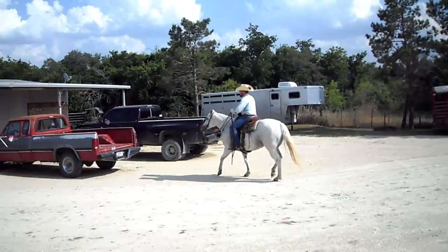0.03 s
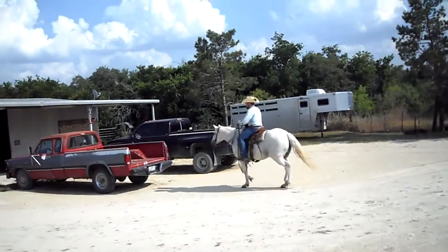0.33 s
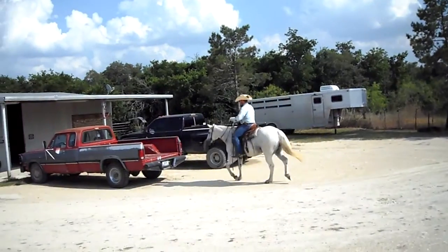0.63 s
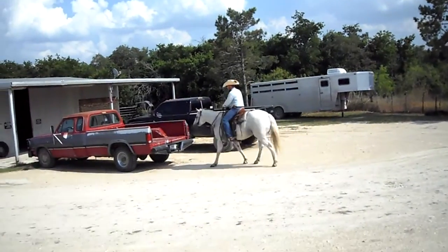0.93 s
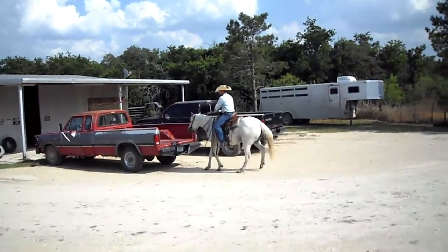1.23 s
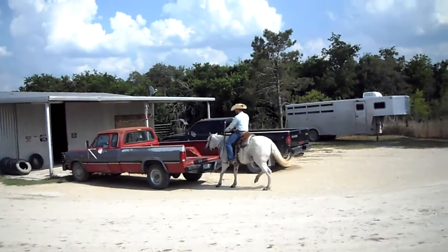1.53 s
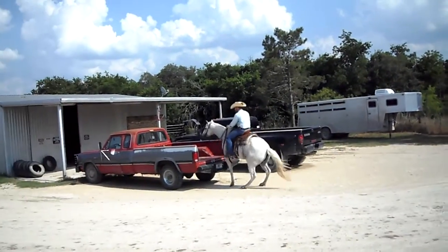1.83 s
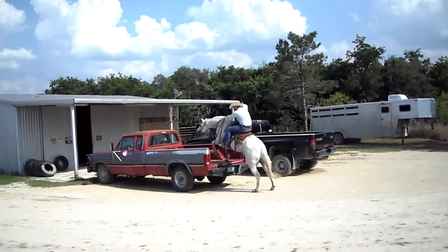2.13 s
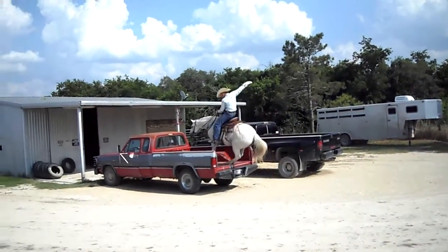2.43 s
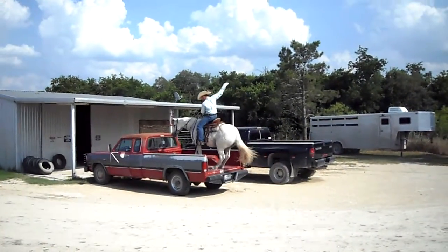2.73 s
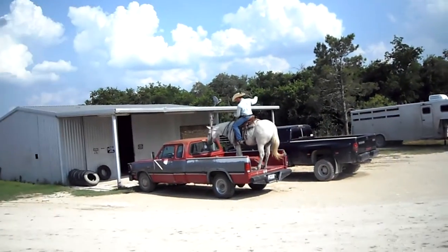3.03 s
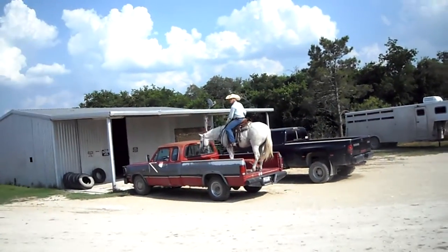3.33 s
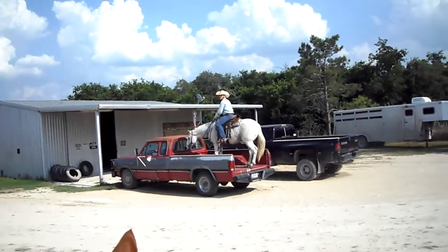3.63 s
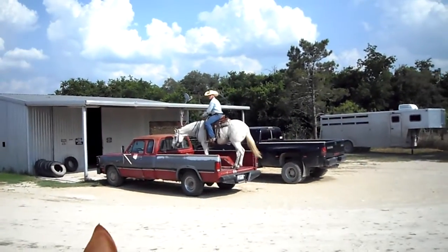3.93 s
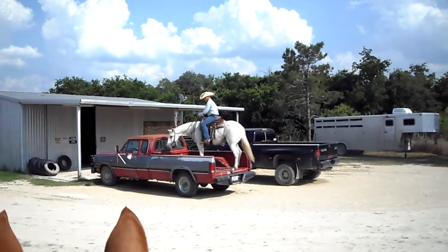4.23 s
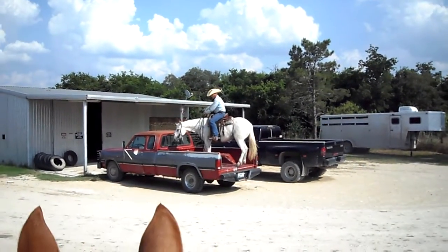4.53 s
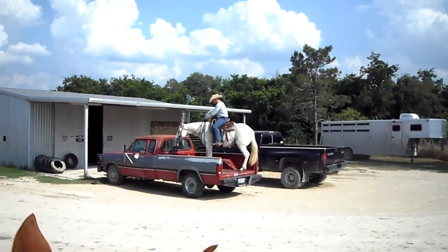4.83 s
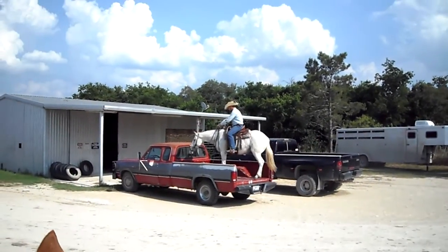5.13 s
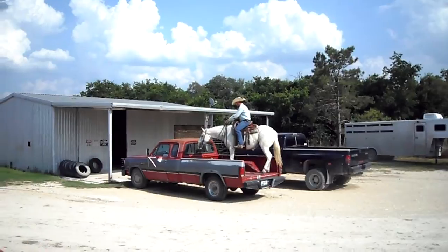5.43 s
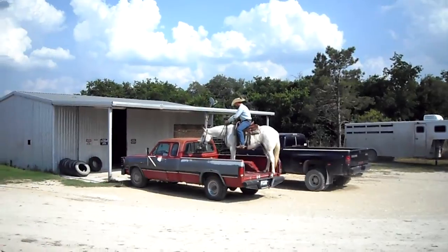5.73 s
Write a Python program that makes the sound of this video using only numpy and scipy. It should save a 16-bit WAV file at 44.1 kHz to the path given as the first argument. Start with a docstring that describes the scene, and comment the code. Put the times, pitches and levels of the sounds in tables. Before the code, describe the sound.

A horse's tack clicks, then its hooves boom on a steel pickup bed, setting something loose rattling over a faint machine hum.

```python
"""A ridden horse jumps into the steel bed of a pickup in a gravel yard and shifts its feet there.
Each hoof makes the sheet metal boom, and the rocking truck sets a loose fitting chattering.
The tack (the horse's straps and buckles) clicks and jingles close by; hooves and leather scuff,
and one step lands on gravel just before the jump.
A machine hums steadily across the yard, over soft outdoor noise and a thin hiss."""
import sys
import numpy as np
from scipy import signal
from scipy.fft import rfft, irfft
from scipy.io import wavfile
from scipy.ndimage import uniform_filter1d

SR = 44100
rng = np.random.default_rng(int(sys.argv[2]) if len(sys.argv) > 2 else 0)


def pcm_store(signal):
    """Save signal as 16-bit PCM."""
    levels = np.round(np.clip(np.atleast_2d(signal), -1, 1) * 32767)
    wavfile.write(sys.argv[1], SR, levels.astype(np.int16).T)


N = 259308

# Hoof blows: start_s, level_db, boom_db, body_db, clang_db, crack_db, boom_hz, push_s, spot_hz, spot_db
HOOF_BLOWS = [(2.093, -33, 2, 0, -4.5, -7, 189, 0.023, 657, -10),
              (2.375, -35, -7.5, 4.5, -8, 0.5, 188.5, 0.033, 640, -0.5),
              (2.474, -17, -5, 0, -3.5, 0, 142.6, 0.015, 1597, -10),
              (3.6257, -27, 0.5, -0.5, -1, 2.5, 150.6, 0.013, 2493, -7),
              (4.2938, -25.5, -1, 1.5, -1, 3.5, 208, 0.012, 491, -4),
              (4.821, -31.5, 3.5, -4.5, -2.5, 2, 140.3, 0.018, 1064, -2),
              (5.742, -36.5, 0, -3, 2, 3, 178, 0.014, 1627, 3)]
def hooves():
    """The horse lands and steps on the steel bed, each blow with its own tone."""
    out = np.zeros(N)
    for start_s, level_db, *tone_db, boom_hz, push_s, spot_hz, spot_db in HOOF_BLOWS:
        add(out, start_s, amp(level_db) * hoof(tone_db, boom_hz, push_s, spot_hz, spot_db))
    return out


# Where a blow's boom, body, clang and crack lie: pitch_hz
TONE_BANDS = [160, 520, 1500, 4500]
# How strongly the steel panels ring, from bass to treble: pitch_hz, level_db
PANEL_SPECTRUM = [(41, -49), (70, -19), (138, -1), (307, -10.5), (360, -8), (620, -10), (679, -12.5),
                  (1000, -8.5), (1650, -9.5), (1810, -14), (3040, -20), (4090, -21.5), (9700, -41),
                  (10900, -43.5), (16000, -59)]
# How the panels swell and fade (t60 is the time to fade by 60 dB):
# pitch_hz, rise_s, early_t60_s, late_db, late_t60_s
PANEL_FADES = [(149, 0.008, 0.39, -6.5, 0.91), (460, 0.0097, 0.27, -8.5, 0.74),
               (1450, 0.00099, 0.14, -7, 0.62), (3540, 0.0021, 0.1, -13, 1),
               (10000, 0.00091, 0.085, -11.5, 0.73)]
# The bed's strongest modes, the notes it rings at by itself: pitch_hz, level_db, t60_s
BED_MODES = [(143, -9, 0.73), (196.3, 1.5, 0.82), (230.7, 2.5, 0.51), (321, -11, 0.56), (364, -4.5, 0.4),
             (449.3, 0, 0.21), (465, -23, 0.18), (598.5, 0.5, 0.27), (673, -13, 0.44), (771, -2.5, 0.48),
             (834, -6, 0.45), (906, -24, 0.31), (1010, 0.5, 0.42), (1100, -3, 0.46), (1208.4, 3, 0.2),
             (1207, 0, 0.19), (1406, -8, 0.13), (1570, 0.5, 0.18), (1670, -4.5, 0.22), (1630, -25, 0.21),
             (3060, -8, 0.1), (3130, -5, 0.14)]
def hoof(tone_db, boom_hz, push_s, spot_hz, spot_db,
         modes_db=-14, boom_db=-2, boom_t60_s=0.17, spot_t60_s=0.11, size=40000):
    """A hoof pushes on the steel for a moment; then the panels ring and fade."""
    t, hz = np.arange(size) / SR, bins(size)
    tone = list(zip(TONE_BANDS, tone_db))
    panel_gain = amp(curve(PANEL_SPECTRUM, hz)) * hz / np.hypot(hz, 150)
    panels = unit_rms(filtered(panel_noise(size), panel_gain))
    centres, out = [row[0] for row in PANEL_FADES], np.zeros(size)
    for band, (centre, rise_s, early_t60, late_db, late_t60) in zip(np.eye(len(centres)), PANEL_FADES):
        share = curve(list(zip(centres, band)), hz) * amp(curve(tone, hz))
        fading_s = np.maximum(t - push_s * (900 / centre) ** 0.095, 0)  # the bass builds for longer
        fade = np.hypot(amp(-60 * fading_s / early_t60), amp(late_db - 60 * t / late_t60))
        out += filtered(panels, share) * (1 - np.exp(-t / rise_s)) * fade
    released_s = np.maximum(t - push_s, 0)
    # each spot on the floor starts the main modes at a different point in their swing
    for (pitch_hz, mode_db, t60), phase in zip(BED_MODES, rng.random(len(BED_MODES))):
        level = amp(modes_db + mode_db + curve(tone, pitch_hz) - 60 * released_s / t60)
        swell = 1 - np.exp(-t * pitch_hz / 1.4)
        out += level * swell * np.sin(2 * np.pi * (pitch_hz * t + phase))
    # the spot right under the hoof sings out
    spot = amp(spot_db - 60 * released_s / spot_t60_s) * (1 - np.exp(-t / 0.0014))
    # the floor flexes under the horse's weight
    boom = amp(boom_db + tone_db[0] - 60 * released_s / boom_t60_s) * (1 - np.exp(-t / 0.0084)) ** 2
    return out + spot * np.sin(2 * np.pi * spot_hz * t) + boom * np.sin(2 * np.pi * boom_hz * t)


def panel_noise(size):
    """Sheet metal rings at many pitches at once: evenly in the bass, uneven and clangy higher up."""
    even = raw = rng.standard_normal(size)
    for _ in range(2):  # make all pitches about equally strong
        spectra = signal.stft(even, nperseg=1024)[2]
        even = signal.istft(spectra / (abs(spectra) + 1e-12), nperseg=1024)[1][:size]
    hz = bins(size)
    treble = hz ** 4 / (hz ** 4 + 1200. ** 4)
    ripple_db = 2.5 * unit_rms(uniform_filter1d(rng.standard_normal(len(hz)), size=90))
    return unit_rms(filtered(unit_rms(even), 1 - treble) + filtered(raw, treble * amp(ripple_db)))


# Runs of knocks as the truck rocks: start_s, length_s, level_db, knocks_per_s, loudest_after_s
CHATTER_RUNS = [(2.16, 0.21, -35, 46, 0.073), (2.568, 0.32, -38, 43.8, 0.038),
                (3.668, 0.17, -37, 43.7, 0.064), (4.363, 0.162, -36, 45.6, 0.021),
                (4.886, 0.11, -39.5, 46, 0.0045)]
def fitting_knocks(fade_db=17.5, scatter_db=1.9, jitter_s=.0016):
    """The loose fitting bounces almost evenly, swelling and fading. Gives rows of start_s, level_db."""
    rows = []
    for start_s, length_s, level_db, rate, loudest_s in CHATTER_RUNS:
        after_s = np.arange(max(round(length_s * rate), 1)) / rate
        timing, strength = rng.standard_normal((32, 2))[:len(after_s)].T
        knock_db = level_db - fade_db * ((after_s - loudest_s) / length_s) ** 2 + scatter_db * strength
        rows += zip(start_s + after_s + jitter_s * timing, knock_db)
    return rows


# How strongly the loose fitting rings: pitch_hz, level_db
FITTING_SPECTRUM = [(400, -0.5), (1500, -3.5), (2800, -7), (3400, 1.5), (3850, -5.5), (4300, -11.5),
                    (6000, -12.5), (8000, -15), (11300, -19), (12000, -25), (16000, -32)]
def loose_fitting(level_db=-6, contact_s=.007, clink_t60_s=.04, tail_db=-7, tail_t60_s=.28,
                  squeak_db=-2, squeak_hz=3350, rise_hz=500, squeak_s=0.0091, size=6000, count=60):
    """Each knock is a bright clink and a tiny rising squeak of metal on metal; then it rings on."""
    out, t = np.zeros(N), np.arange(size) / SR
    mode_hz = (np.linspace(2400, 11600, count) + rng.uniform(-77, 61, count))[:, None]
    modes = amp(curve(FITTING_SPECTRUM, mode_hz)) * np.exp(2j * np.pi * mode_hz * t)
    modes *= (squeak_hz / mode_hz) ** .5  # the high modes keep less of the blow
    clink_fade = amp(-60 * np.maximum(t - contact_s, 0) / clink_t60_s)
    squeak_swell = np.sqrt(np.sin(np.pi * np.minimum(t / squeak_s, 1)) + 1e-9)
    for start_s, knock_db in fitting_knocks():
        clink = noise(size, amp(curve(FITTING_SPECTRUM, bins(size))))
        phases = np.exp(2j * np.pi * rng.random(count))
        ring = unit_rms((phases @ modes).real + .5 * clink)
        pitch_hz = squeak_hz * rng.uniform(.96, 1.04)
        glide_hz = rise_hz * rng.random() * np.minimum(2 * t / squeak_s, 1)
        squeak = np.sin(2 * np.pi * np.cumsum(pitch_hz + glide_hz) / SR) * squeak_swell
        knock = unit_rms(clink + ring) * clink_fade + amp(squeak_db) * squeak
        knock += ring * amp(tail_db - 60 * t / tail_t60_s)
        add(out, start_s, amp(knock_db + level_db) * knock * (1 - np.exp(-t / 0.00028)))
    return out


# Sharp clicks of the tack, and one dull, gritty hoof step on gravel (at 1.851 s):
# start_s, level_db, pitch_hz, spread_octaves, ring_s, knock_db
CLICKS_AND_STEP = [(0.8906, -20, 2300, 1.6, 0.0022, -1), (.9237, -31.5, 1740, 1.8, 0.0014, 5),
                   (.9568, -17, 9000, 1.9, 0.0012, -21.5), (.999, -26.5, 5900, 1.3, 0.0009, -19),
                   (1.0766, -13, 4500, 1.23, 0.0008, -13.5), (1.1416, -31, 3930, 0.34, 0.00088, -33),
                   (1.2346, -23, 990, 2.5, 0.0011, -1), (1.2502, -4, 5830, 0.52, 0.00058, -14),
                   (1.2641, -14, 3900, 0.79, 0.0023, -11.5), (1.2985, -15.5, 5250, 0.47, 0.0019, -18.5),
                   (1.299, -39.5, 1176, 0.045, .008, -30), (1.851, -30, 1700, 1.3, .009, -12),
                   (2.869, -42, 7800, 0.53, .0043, -30)]
# Pitches that the buckles make louder: pitch_hz, width_hz, lift_db
BUCKLE_PEAKS = [(2850, 550, 12), (5850, 1060, 8), (13800, 1900, 11)]
def tack_and_gravel_step(ring_db=-13, tail_db=-44, tail_s=0.027, knock_hz=950, size=4096):
    """Tack catches, or a hoof meets gravel: a snap, a low knock, a gritty ring and a faint tail."""
    out, t, hz = np.zeros(N), np.arange(size) / SR, bins(size)
    buckle_db = sum(db / (1 + ((hz - pitch) / width) ** 2) for pitch, width, db in BUCKLE_PEAKS)
    knock_peak_db = -16 * np.log10(1 + np.log2((hz + 30) / knock_hz) ** 2)
    knock = pulse(knock_peak_db - 40 * np.log10(1 + (hz / 5000) ** 2))
    for start_s, level_db, pitch_hz, spread, ring_s, knock_db in CLICKS_AND_STEP + strap_ticks():
        octaves = np.log2((hz + 30) / pitch_hz)
        distance = (octaves / spread) ** 2
        snap = pulse(buckle_db - 14 * np.log10(1 + distance) - 1.13 * np.minimum(distance, 12))
        snap += amp(knock_db) * np.roll(knock, 8)
        grit = unit_rms(signal.fftconvolve(rng.standard_normal(2 * size), snap, "valid")[:size])
        fade = amp(ring_db) * np.exp(-t / ring_s) + amp(tail_db) * np.exp(-t / tail_s)
        add(out, start_s, amp(level_db) * (snap + grit * fade))
        slip = amp(level_db - 12.5) * grit * np.exp(-t / 0.00073)
        add(out, start_s - size / SR, slip[::-1])  # the surfaces scrape just before they catch
    return out


# Times when the straps move: start_s, end_s, ticks_per_s, level_db
STRAP_MOVES = [(0.152, 0.854, 7.5, -43.5), (0.952, .972, 70, -31), (1.002, 1.017, 70, -29),
               (1.198, 1.25, 55, -33), (1.45, 2.1, 4.5, -44), (5.201, 5.55, 5.5, -45)]
def strap_ticks(pitch_hz=6000, spread_octaves=0.88, ring_s=.0063, knock_db=-25,
                scatter_db=2, scatter_octaves=0.35):
    """Moving straps tick faintly at chance moments. Gives rows like those of CLICKS_AND_STEP."""
    rows = []
    for start_s, end_s, rate, level_db in STRAP_MOVES:
        count = max(round((end_s - start_s) * rate), 1)
        for k, (timing, strength, brightness) in enumerate(rng.uniform(-1, 1, (16, 3))[:count]):
            tick_s = start_s + (end_s - start_s) * (k + .5 + .5 * timing) / count
            tick_db = level_db + scatter_db * strength
            tick_hz = pitch_hz * 2 ** (scatter_octaves * brightness)
            rows.append((tick_s, tick_db, tick_hz, spread_octaves, ring_s, knock_db))
    return rows


# The notes of a small steel ring: pitch_hz, level_db, t60_s
RING_MODES = [(4830, -1.5, .043), (5770, -0.5, .025), (10600, -15, .03), (13770, -14, .03)]
def jingle(start_s=.401, level_db=-43):
    """A small steel ring is tapped and rings briefly."""
    out, t = np.zeros(N), np.arange(SR) / SR
    for pitch_hz, mode_db, t60 in RING_MODES:
        add(out, start_s, amp(level_db + mode_db - 60 * t / t60) * np.sin(2 * np.pi * pitch_hz * t))
    return out


# Soft rubs: start_s, level_db, pitch_hz, spread_octaves, length_s
RUBS = [(1.701, -54, 500, 1.1, 0.036), (1.848, -38.5, 920, 0.54, 0.014), (2.452, -46.5, 3400, .44, 0.021),
        (4.972, -48.5, 590, .7, 0.077), (5.465, -48.5, 630, 0.69, 0.052), (5.579, -52, 450, 1.1, .06)]
def scuffs():
    """Hooves and leather rub, making short noises that swell and fade."""
    out = np.zeros(N)
    for start_s, level_db, pitch_hz, spread, length_s in RUBS:
        size = round(length_s * SR)
        octaves = np.log2((bins(size) + 1) / pitch_hz)
        rub = noise(size, np.exp(-.5 * (octaves / spread) ** 2))
        add(out, start_s, amp(level_db) * rub * np.sin(np.pi * np.arange(size) / size))
    return out


# Low bumps of air: start_s, level_db, pitch_hz, fade_s
AIR_PUSHES = [(0.197, -33, 86.5, 0.0092), (0.318, -36.5, 110, 0.0076)]
def air_bumps():
    """Soft pushes of air at the microphone die away quickly."""
    out, t = np.zeros(N), np.arange(SR) / SR
    for start_s, level_db, pitch_hz, fade_s in AIR_PUSHES:
        add(out, start_s, amp(level_db) * np.exp(-t / fade_s) * np.sin(2 * np.pi * pitch_hz * t))
    return out


# The far machine's tones: pitch_hz, level_db
MACHINE_TONES = [(91.5, -58.5), (274.5, -54.5), (656.8, -64), (1071, -65.5), (1238, -66.5), (1314, -64.5),
                 (1378, -96), (1755, -73), (2202, -74), (2299, -76), (2568, -68.5)]
# Open air and the machine's rush: pitch_hz, level_db
AIR_SPECTRUM = [(12, -64), (20, -9), (96, -5), (120, -12.5), (154, -5), (241, -8.5), (277, -1), (301, -12),
                (607, -16.5), (660, -14), (897, -12), (1330, -15), (1860, -22), (2600, -24.5),
                (16000, -49.5)]
def machine_and_air(hum_db=-0.77, waver=0.002, rush_hz=1300, rush_db=-11, air_db=-51.06, treble_db=4,
                    fade_in_db=-6, fade_in_s=0.46):
    """A far machine's tones waver together over its rush and the outdoor noise; all fade in."""
    t, hz = np.arange(N) / SR, bins(N)
    air = noise(N, amp(curve(AIR_SPECTRUM, hz)))
    treble = filtered(air, hz ** 4 / (hz ** 4 + 2370.0 ** 4))
    rush = noise(N, np.exp(-((hz - rush_hz) / 230) ** 2))
    air += treble * (amp(treble_db) - 1) + amp(rush_db) * rush
    machine_s = np.cumsum(1 + waver * wander(3.56)) / SR  # a clock that runs slightly fast and slow
    hum = np.zeros(N)
    for pitch_hz, level_db in MACHINE_TONES:
        level = amp(level_db + wander(3.2)) * np.sqrt(2)
        hum += level * np.sin(2 * np.pi * (pitch_hz * machine_s + rng.random()))
    return (amp(air_db) * air + amp(hum_db) * hum) * amp(fade_in_db * np.exp(-t / fade_in_s))


# How loud the far hiss is over time: time_s, level_db
HISS_LEVELS = [(.1, -81), (2.0, -68), (3.5, -89), (4.7, -69), (5.2, -66.5), (5.87, -65)]
def hiss(pitch_hz=5000, width_hz=1450):
    """A thin, distant hiss slowly swells, sinks and swells again."""
    band = noise(N, np.exp(-((bins(N) - pitch_hz) / width_hz) ** 4))
    return band * amp(np.interp(np.arange(N) / SR, *np.transpose(HISS_LEVELS)))


def amp(db):
    """Turns decibels into a number to multiply by."""
    return 10 ** (np.asarray(db) / 20)


def unit_rms(x):
    """Scales a sound so its average strength (rms) is 1."""
    return x / np.sqrt(np.mean(x ** 2) + 1e-20)


def curve(points, hz):
    """Joins (pitch_hz, value) points on an octave scale and reads the value at hz."""
    pitch_hz, value = np.transpose(points)
    return np.interp(np.log(hz + 1), np.log(pitch_hz + 1), value)


def add(mix, start_s, sound):
    """Mixes a sound in at start_s."""
    part = mix[max(round(start_s * SR), 0):][:len(sound)]
    part += sound[:len(part)]


def bins(size):
    """The frequencies in a sound of this many samples."""
    return np.fft.rfftfreq(size, 1 / SR)


def filtered(x, gain):
    """Turns each frequency up or down by its gain."""
    return irfft(rfft(x) * gain, len(x))


def noise(size, gain):
    """Filtered noise of strength 1."""
    return unit_rms(filtered(rng.standard_normal(size), gain))


def wander(rate_hz):
    """A smooth random drift of strength 1."""
    return noise(N, np.exp(-(bins(N) / rate_hz) ** 2))


def pulse(spectrum_db):
    """The quickest click with this spectrum, scaled to a peak of 1."""
    log_gain = np.log(amp(np.maximum(spectrum_db, spectrum_db.max() - 90)))
    mirrored = np.r_[log_gain, log_gain[-2:0:-1]]
    click = np.fft.ifft(np.exp(np.conj(signal.hilbert(mirrored)))).real
    return click / abs(click).max()


def scene():
    """The horse, the truck and the yard together in one channel."""
    mix = hooves() + machine_and_air() + hiss() + air_bumps() + scuffs() + jingle()
    return (mix + loose_fitting() + tack_and_gravel_step())[None]


def record(dry, start_s=.0715, thump_db=-35, settle_s=0.12, cutoff_hz=16500):
    """The microphone switches on with a soft thump as it settles; the highest treble is cut."""
    since_s = np.arange(N) / SR - start_s
    switch_on = np.clip(since_s / .001, 0, 1)
    thump = amp(thump_db) * np.exp(-np.maximum(since_s, 0) / settle_s)
    lowpass = signal.firwin(401, cutoff_hz, window=("kaiser", 9), fs=SR)
    return signal.oaconvolve((dry - thump) * switch_on, lowpass[None], "same")


dry = scene()
out = record(dry)
pcm_store(out)
```